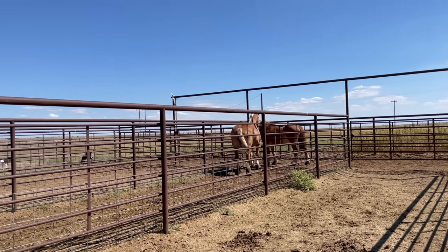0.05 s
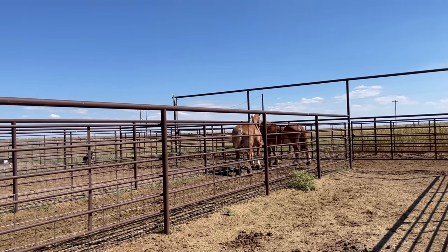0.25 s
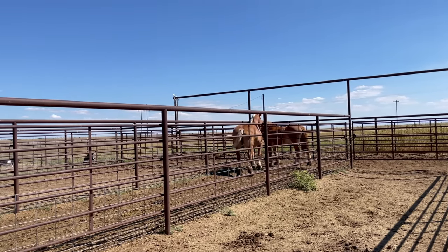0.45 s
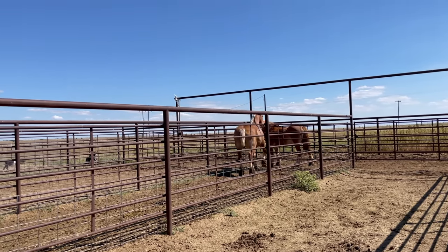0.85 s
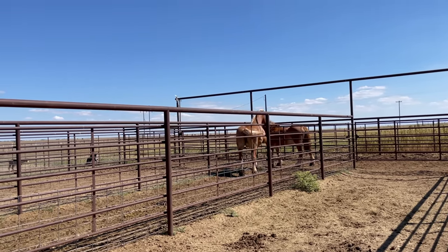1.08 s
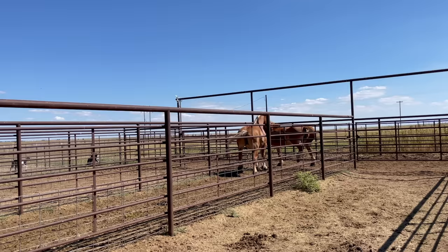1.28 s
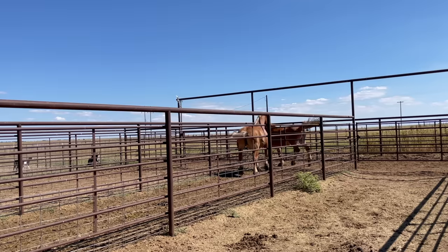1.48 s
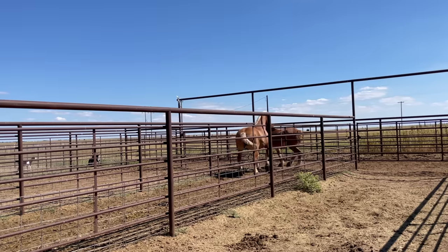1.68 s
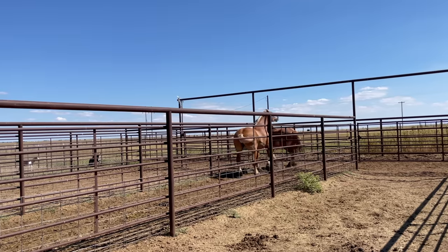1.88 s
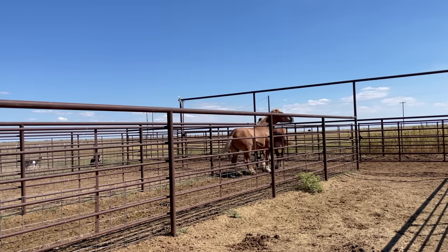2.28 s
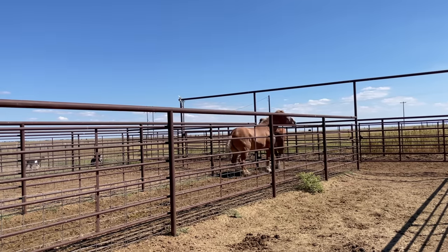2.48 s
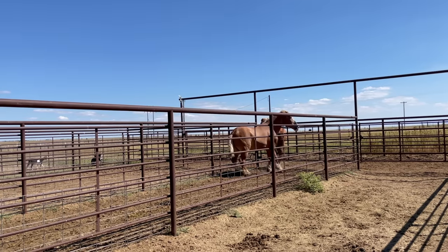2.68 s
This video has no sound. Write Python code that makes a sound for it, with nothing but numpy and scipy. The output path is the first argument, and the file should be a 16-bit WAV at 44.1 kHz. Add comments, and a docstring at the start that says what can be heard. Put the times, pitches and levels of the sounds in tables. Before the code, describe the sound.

A horse squeals in an outdoor pen. At first there is only faint wind bumping the microphone. At about 0.8 seconds the harsh, shrill call starts, loudest from 1.1 to 1.6 seconds, as steel rails rattle and scrape. From 2 seconds it breaks into short yelps, then sinks to a low grunt around 2.5 seconds, with a few lighter rattles, fading by 2.8 seconds.

```python
"""A harsh squeal, breaking into yelps and sinking to a grunt: one horse calls at another across a steel pen.
The call is biphonic: a low buzz modulates a high whistle, over turbulence that resonates in the throat.
As the horses jostle, the steelwork rattles in its natural modes and scrapes with a bright hiss.
Ground and rails scatter the sound; wind nudges the microphone, with faint outdoor air behind."""
import sys
import numpy as np
from scipy import signal
from scipy.fft import rfft, irfft
from scipy.io import wavfile

SR = 44100
rng = np.random.default_rng(int(sys.argv[2]) if len(sys.argv) > 2 else 0)


def inscribe(sig):
    """Save sig as 16-bit PCM at rate SR to the path in sys.argv[1].

    A 1-D sig is mono; a 2-D sig holds one channel per row.
    Samples are clipped to [-1, 1] before scaling.
    """
    pcm = np.round(np.clip(np.atleast_2d(sig).T, -1, 1) * 32767)
    wavfile.write(sys.argv[1], SR, pcm.astype(np.int16))


N = 125685
TIME, FREQS = np.arange(N) / SR, np.fft.rfftfreq(N, 1 / SR)

# low voice, high voice and a thinner whistle that joins mid-squeal: t/s, f/Hz, relative level/dB
BUZZ = [(.86, 303.6, -34.5), (.92, 278.1, -29), (.985, 255.9, -36), (1.045, 259.4, -22.5),
        (1.115, 269.7, -17.5), (1.145, 264.5, -34), (1.175, 272.5, -19.5), (1.205, 272.8, -35),
        (1.3, 324, -39.5), (1.45, 345, -34.5), (1.55, 405.2, -37), (1.66, 456, -38.5), (1.75, 452.5, -33.5),
        (1.825, 456.2, -26.5), (1.885, 461, -40), (1.952, 424, -60), (1.978, 427.4, -33),
        (2.04, 424, -35.5), (2.08, 402, -32), (2.18, 392, -54), (2.385, 439.7, -45.5), (2.42, 214.6, -32.5),
        (2.46, 163.2, -28), (2.495, 165.1, -28.5), (2.55, 233.2, -40), (2.59, 165, -34), (2.64, 150.4, -46)]
WHISTLE = [(.775, 1170, -48), (.803, 1270, -38), (.82, 1410, -35), (.85, 1450, -34), (.88, 1590, -34),
           (1.0, 1410, -42), (1.06, 1385, -33.5), (1.1, 1345, -29.5), (1.15, 1385, -34.5), (1.3, 1440, -41),
           (1.45, 1370, -37), (1.56, 1460, -42.5), (1.78, 1465, -39), (1.85, 1415, -37),
           (1.915, 1405, -40.5), (1.96, 1365, -41)]
THIN_WHISTLE = [(1.46, 1682, -33), (1.55, 1705, -30.5), (1.66, 1680, -40), (1.73, 1615, -35.5),
                (1.83, 1604, -34), (1.96, 1578, -43)]
# harmonics of each voice, from the fundamental up: relative level/dB
BUZZ_HARMONICS = [1, -18, -22, -29, -28, -30, -42]
WHISTLE_HARMONICS = [0, -14, -18, -24]
# unsteadiness of the voices: t/s, roughness (0-1)
ROUGHNESS = [(0.84, .15), (0.93, .6), (1.07, .15), (1.17, .2), (1.26, .9), (1.45, .7), (1.62, .35),
             (1.76, .17), (1.93, .1), (2.0, .55)]
# shrillness of the high voice: t/s, overtone boost/dB
SHRILLNESS = [(.8, -1), (.815, -14), (1.5, -3), (1.75, 4)]
# peaks colouring the low voice; peaks and a notch colouring the high: f/Hz, half-width/Hz, gain/dB
BUZZ_COLOUR = [(535, 55, 7), (930, 50, 6), (1360, 70, 9)]
WHISTLE_COLOUR = [(2485, 55, 14), (2705, 35, -10), (2780, 50, 10), (4180, 70, 3), (5290, 90, 5)]
# rasp in three registers: t/s, low level/dB, middle level/dB, treble level/dB
RASP_LEVELS = [(0.777, -77, -54.5, -57), (.83, -65, -39.5, -54), (.87, -43, -36, -51.5),
               (0.919, -35.5, -34, -46.5), (1.03, -33.5, -37, -41), (1.118, -23.5, -31, -35.5),
               (1.16, -31, -37.5, -35), (1.26, -27.5, -34.5, -31.5), (1.55, -33.5, -38.5, -37),
               (1.85, -40.5, -43, -43.5), (1.939, -45, -45.5, -47), (1.99, -36.5, -40, -43),
               (2.1, -40, -40, -45.5), (2.18, -53, -45, -50), (2.25, -47, -42.5, -45.5),
               (2.34, -50.5, -50, -49.5), (2.41, -46, -44, -47.5), (2.46, -47, -51.5, -55),
               (2.55, -49.5, -47, -53), (2.68, -55.5, -60.5, -50), (2.85, -65, -64.5, -55)]
# throat resonances, one list a register: f/Hz, width/Hz, relative level/dB
THROAT_FORMANTS = [
    [(511.4, 54, 11), (794, 510, 3.5), (1022, 164, 4)],
    [(1326, 57, 8), (1630, 107, -1.5), (1819, 387, 4.5)],
    [(2470, 207, 3), (3100, 1700, 0), (4500, 810, 2.5), (6380, 3150, -6.5), (13900, 4200, -17)],
]
# cracks of the high voice: t/s, length/s, first, middle and last f/Hz, level/dB, overtone boost/dB
YELPS = [(.805, .075, 3560, 3280, 3170, -49.5, -40), (1.968, .055, 1370, 1305, 1345, -32, -4),
         (2.032, .042, 1350, 1395, 1375, -40.5, 3), (2.06, .07, 1880, 1790, 1450, -37, -18),
         (2.078, .036, 1520, 1510, 1420, -32.5, -12), (2.117, .04, 1430, 1470, 1560, -36, -18),
         (2.198, .065, 1385, 1375, 1230, -35.5, 2), (2.238, .032, 1980, 1870, 1740, -36, -15),
         (2.255, .036, 1320, 1390, 1300, -43, 0), (2.298, .1, 1285, 1356, 1280, -36, 0),
         (2.325, .055, 1800, 1808, 1785, -44, 9), (2.395, .04, 2200, 2000, 1700, -44, -10)]
# rattles of the steelwork: t/s, relative level/dB
RATTLES = [(1.056, -36), (1.147, -37.5), (1.245, -35), (1.34, -40.5), (1.394, -38.5), (1.554, -45),
           (1.96, -48.5), (2.204, -45.5), (2.366, -48.5), (2.477, -44.5), (2.563, -38.5), (2.76, -52)]
# natural modes of the steel: f/Hz, relative level/dB, T60/s
STEEL_MODES = [(2010, -5, 0.28), (3140, -9, 0.45), (3990, -10, .5), (4360, -3, 0.36), (4780, 1, 0.12),
               (5750, -6, .26), (6055, -5, 0.26), (14050, -5, .25)]
# noise of steel contacts: f/Hz, relative spectral level/dB
CLATTER_SPECTRUM = [(300, -11), (1500, -10), (3000, -3), (4700, 3), (5600, -3), (9800, -10.5), (14200, -16),
                    (15200, -13.5)]
# scatter from ground and rails: f/Hz, level against the direct sound/dB
SCATTER_SPECTRUM = [(250, -19), (600, -9), (1300, -4.5), (2500, -3), (5000, -4), (12000, -14)]
# phase between the two microphone ports: f/Hz, left lead/rad
PORT_PHASE = [(300, 0), (1120, .6), (1890, -.5), (2500, .8), (5170, .3), (5770, -1), (9560, -3.6),
              (10300, -6.1)]
# balance of the ports: f/Hz, left minus right level/dB
PORT_BALANCE = [(700, 0), (1290, 5.5), (2600, .5)]
# wind buffets: t/s, relative level/dB, Gaussian half-length/s, upper edge f/Hz
BUFFETS = [(0.235, -33.5, 0.0075, 261), (0.393, -27, 0.0088, 366), (0.451, -27, 0.0081, 225),
           (0.458, -23, 0.00085, 484), (0.484, -37.5, 0.0013, 420), (0.502, -25.5, 0.0089, 156),
           (0.597, -29.5, 0.0079, 278), (.643, -24, 0.0027, 360), (0.673, -37, 0.004, 435),
           (0.779, -27, 0.018, 233), (0.797, -20.5, 0.0063, 450), (0.84, -28.5, 0.0099, 323),
           (0.923, -29.5, 0.022, 300), (1.205, -26.5, 0.012, 170), (1.43, -35.5, 0.023, 192),
           (1.773, -35.5, 0.021, 210), (2.15, -30.5, 0.021, 182), (2.786, -35, 0.012, 200)]
# wind rumble: t/s, level/dB
WIND_LEVEL = [(0, -34), (.8, -38.5), (1.3, -40.5), (1.7, -41.5), (1.95, -51.5), (2.42, -39), (2.68, -53),
              (2.85, -40.5)]
# wind rumble and distant air: f/Hz, relative spectral level/dB
WIND_SPECTRUM = [(20, -25), (55, 5), (110, -2), (300, -12.5), (500, -39), (1000, -49), (3000, -78)]
AIR_SPECTRUM = [(500, 5), (2000, -15), (5000, -26), (8500, -37.5), (16000, -40)]
# microphone response: f/Hz, gain/dB
MIC_RESPONSE = [(7800, -1), (8600, -24), (9500, 1), (14700, -3), (15500, -32)]

JITTER_HZ, RAGGED_HZ = 105, 22  # bandwidths of fast and slow random fluctuation
CONTACT_RISE_S = .0043


def squeal(buzz_db=-2.5, thin_db=-1, shake_depth=.95, break_s=1.9, break_length_s=.1, break_depth=1.7):
    """Biphonation: the buzz modulates the whistle's amplitude, throwing sidebands around it."""
    rough, = curves(ROUGHNESS)
    shrill_db, = curves(SHRILLNESS)
    low_phase, low_gain = oscillator(BUZZ, jitter=.08, rough=rough + .14)
    high_phase, high_gain = oscillator(WHISTLE, jitter=.035, rough=rough)
    thin_phase, thin_gain = oscillator(THIN_WHISTLE, jitter=.012, rough=rough)
    # period doubling: a subharmonic briefly displaces the sidebands
    doubling = break_depth * np.sin(np.pi * np.clip((TIME - break_s) / break_length_s, 0, 1))
    shake = shake_depth * np.cos(low_phase) * np.clip(1 - doubling, 0, 1) * gate(BUZZ)
    modulation = 1 + shake + doubling * np.cos(high_phase / 2)
    buzz = amp(buzz_db) * peak_filter(low_gain * harmonics(low_phase, BUZZ_HARMONICS), BUZZ_COLOUR)
    whistle = comb_colour(high_gain * modulation * harmonics(high_phase, WHISTLE_HARMONICS, shrill_db))
    thin_whistle = amp(thin_db) * thin_gain * np.cos(thin_phase)
    return buzz + whistle + thin_whistle + rasp(low_phase)


def oscillator(table, jitter, rough, waver=.011, shimmer=.6):
    """Phase and amplitude of irregular vibration: roughness sets the jitter, waver and shimmer."""
    hz, db = curves(table)
    detune = jitter * rough * wobble(JITTER_HZ) + waver * rough ** .5 * wobble(RAGGED_HZ)
    phase = 2 * np.pi * np.cumsum(hz * (1 + detune)) / SR
    flutter = (1 + shimmer * rough * wobble(JITTER_HZ)) / np.sqrt(1 + (shimmer * rough) ** 2)
    return phase, np.sqrt(2) * amp(db) * flutter * gate(table)


def harmonics(phase, levels, boost_db=0, ragged_db=3.5):
    """A harmonic series whose overtones swell and fade independently."""
    return sum(amp(db + (k > 0) * (boost_db + ragged_db * wobble(RAGGED_HZ))) * np.cos((k + 1) * phase)
               for k, db in enumerate(levels))


def comb_colour(x, cutoff_hz=5400):
    """Fixed peaks and a notch make overtones flash and vanish as they glide; the highest are dulled."""
    return colour(peak_filter(x, WHISTLE_COLOUR), 1 / (1 + (FREQS / cutoff_hz) ** 20))


def peak_filter(x, peaks):
    """Spectral shaping: peaks lift the partials near them and notches sink them."""
    return colour(x, amp(sum(db / (1 + ((FREQS - hz) / width) ** 2) for hz, width, db in peaks)))


def rasp(buzz_phase, pulsing=.2, patchy_db=1.5, patchy_hz=45):
    """Source and filter: turbulence, pulsed once a cycle by the buzz, excites the throat's resonances."""
    puffs = rng.standard_normal(N) * (1 + pulsing * np.cos(buzz_phase))
    out = 0
    for register, db in zip(THROAT_FORMANTS, curves(RASP_LEVELS)):
        power = sum(amp(peak_db) ** 2 / (1 + ((FREQS - hz) / width * 1.316) ** 2) ** 3
                    for hz, width, peak_db in register)
        band = colour(puffs, np.sqrt(power))
        out += amp(db) * unit_rms(band * amp(patchy_db * wobble(patchy_hz)))
    return out * gate(RASP_LEVELS)


def yelps(jitter=.011, flutter_db=2.5):
    """Voice breaks: each is a short harmonic tone on a parabola of pitch, coloured like the whistle."""
    out = 0
    for s, length, first_hz, middle_hz, last_hz, db, boost_db in YELPS:
        progress = np.clip((TIME - s) / length, 0, 1)
        hz = np.polyval(np.polyfit([0, .5, 1], [first_hz, middle_hz, last_hz], 2), progress)
        phase = 2 * np.pi * np.cumsum(hz * (1 + jitter * wobble(JITTER_HZ))) / SR
        arch = np.sqrt(8 * progress * (1 - progress))
        out += amp(db) * arch * harmonics(phase, WHISTLE_HARMONICS, boost_db)
    return comb_colour(out * amp(flutter_db * wobble(JITTER_HZ)))


def steelwork(ring_db=7, clatter_db=5, clatter_t60=.31, grain_db=3, detune=.0028):
    """Impact excitation: each rattle is a bright clatter and the damped ringing of the steel's modes."""
    grit = unit_rms(noise(amp(spectrum(CLATTER_SPECTRUM))) * amp(grain_db * wobble(470)))
    mode_norm = np.linalg.norm(amp([db for _, db, _ in STEEL_MODES]))
    out = np.zeros(N)
    for s, db in RATTLES:
        start = round(s * SR)
        t = TIME[:min(N - start, SR // 2)]
        ring = 0
        for hz, mode_db, t60 in STEEL_MODES:
            cycles = hz * (1 + detune * rng.standard_normal()) * t + rng.random()
            ring += amp(mode_db - 60 * t / t60) * np.sin(2 * np.pi * cycles)
        ring *= amp(ring_db) / mode_norm * (1 - np.exp(-t / CONTACT_RISE_S))
        clatter = amp(clatter_db - 60 * t / clatter_t60) * np.roll(grit, rng.integers(N))[:len(t)]
        out[start:start + len(t)] += amp(db) * (ring + clatter)
    return out


def scrape(start_s=1.057, release_s=1.42, fade_s=.039, db=-39.5, highpass_hz=9100, grain_db=2.5):
    """Sliding friction: steel grinds on steel through the first rattles with a gritty, bright hiss."""
    rise = np.clip((TIME - start_s) / CONTACT_RISE_S, 0, 1)
    fall = np.exp(-np.maximum(TIME - release_s, 0) / fade_s)
    hiss = noise(amp(spectrum(CLATTER_SPECTRUM)) * FREQS ** 4 / (FREQS ** 4 + highpass_hz ** 4))
    return amp(db) * rise * fall * unit_rms(hiss * amp(grain_db * wobble(JITTER_HZ)))


def pen(x, scatter_t60=.15, delay_s=.002):
    """Multipath propagation: direct sound reaches both ports, then scatter from ground and rails."""
    tilt = amp(spectrum(PORT_BALANCE) / 2)
    ports = np.array([tilt, np.exp(-1j * spectrum(PORT_PHASE)) / tilt])
    tails = rng.standard_normal((2, N)) * amp(-60 * TIME / scatter_t60) * (TIME > delay_s)
    tails = colour(tails / np.linalg.norm(tails[0]), amp(spectrum(SCATTER_SPECTRUM)))[:, :SR // 2]
    return colour(x, ports) + signal.fftconvolve(x[None], tails, axes=1)[:, :N]


def wind(gust_db=3, gust_hz=11, antiphase_db=-11, buffet_db=-1, lowest_hz=55):
    """Turbulent pressure on the microphone: rumble and short buffets, mostly common to both ports."""
    level = amp(curves(WIND_LEVEL)[0] + gust_db * wobble(gust_hz))
    rumble_shape = amp(spectrum(WIND_SPECTRUM))
    common = level * noise(rumble_shape)
    for s, db, half_s, top_hz in BUFFETS:
        window = np.exp(-.5 * ((TIME - s) / half_s) ** 2)
        band = 1 / (1 + (FREQS / top_hz) ** 4) * FREQS ** 2 / (FREQS ** 2 + lowest_hz ** 2)
        push = colour(rng.standard_normal(N) * window, band)
        common += amp(db + buffet_db) * push * np.linalg.norm(window) / np.linalg.norm(push)
    antiphase = amp(antiphase_db) * level * noise(rumble_shape)
    return np.array([common + antiphase, common - antiphase])


def distant_air(db=-52):
    """Ambient noise: a faint, dull hush, uncorrelated between the ports."""
    return amp(db) * np.array([noise(amp(spectrum(AIR_SPECTRUM))) for _ in range(2)])


def amp(db):
    """Decibels to amplitude ratio."""
    return 10 ** (np.asarray(db) / 20)


def unit_rms(x):
    """Normalises to unit mean power."""
    return x / np.sqrt(np.mean(x ** 2) + 1e-20)


def spectrum(table):
    """Interpolates a table on a log-frequency axis."""
    hz, value = np.transpose(table)
    return np.interp(np.log(FREQS + 1), np.log(hz + 1), value)


def curves(table):
    """Interpolates each column of a time table, sample by sample."""
    s, *columns = np.transpose(table)
    return [np.interp(TIME, s, column) for column in columns]


def gate(table, fade_s=.018):
    """An envelope that opens at a table's first time and closes after its last."""
    return np.clip((TIME - table[0][0]) / fade_s, 0, 1) * np.clip((table[-1][0] - TIME) / fade_s + 1, 0, 1)


def colour(x, gain):
    """Linear filtering by a gain per frequency."""
    return irfft(rfft(x) * gain, N)


def noise(gain):
    """Gaussian noise of unit rms with the given spectral shape."""
    return unit_rms(colour(rng.standard_normal(N), gain))


def wobble(hz):
    """Random fluctuation of unit rms, rolling off above the given rate."""
    return noise(1 / (1 + (FREQS / hz) ** 4) * FREQS / (FREQS + hz / 10))


def scene():
    """Superposition of horse and steelwork in the pen, wind and distant air."""
    air = distant_air()
    return pen(squeal() + yelps() + steelwork() + scrape()) + wind() + air


def record(dry, cutoff_hz=15700):
    """The microphone's frequency response, then a low-pass band limit."""
    lowpass = signal.firwin(511, cutoff_hz, window=("kaiser", 9), fs=SR)
    return signal.oaconvolve(colour(dry, amp(spectrum(MIC_RESPONSE))), lowpass[None], "same")


dry = scene()
out = record(dry)
inscribe(out)
```